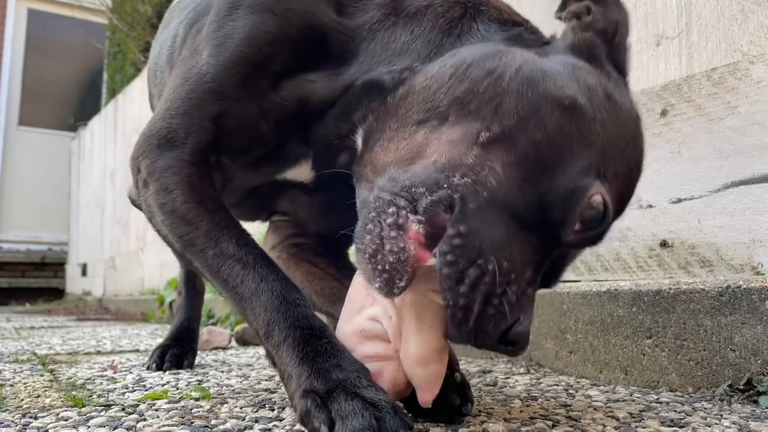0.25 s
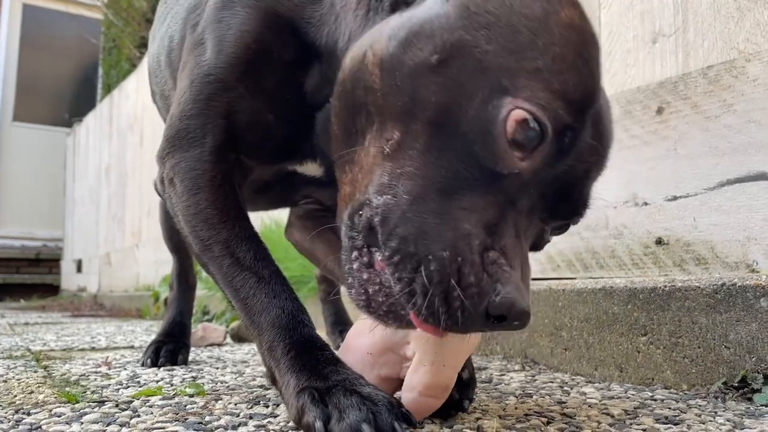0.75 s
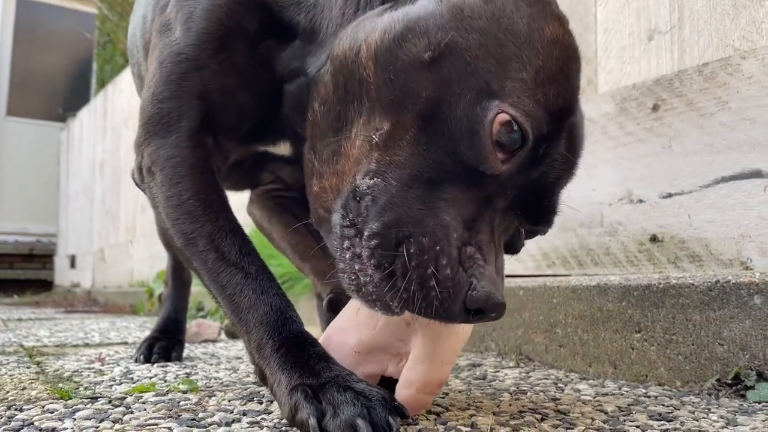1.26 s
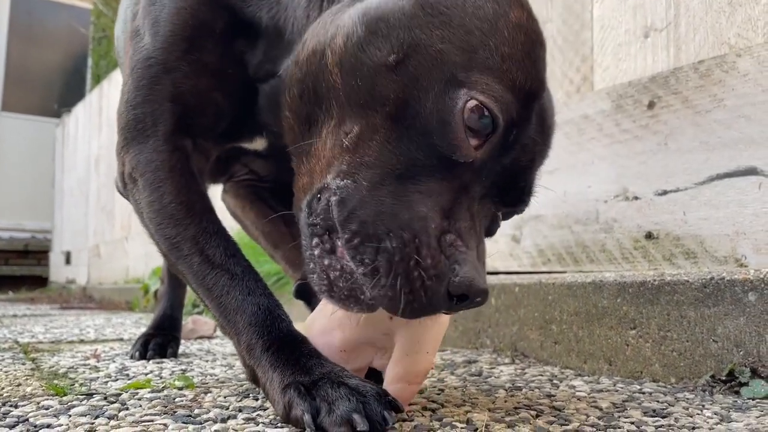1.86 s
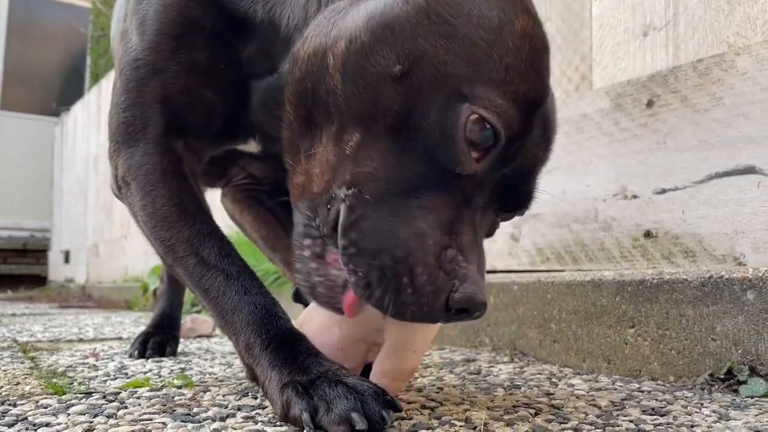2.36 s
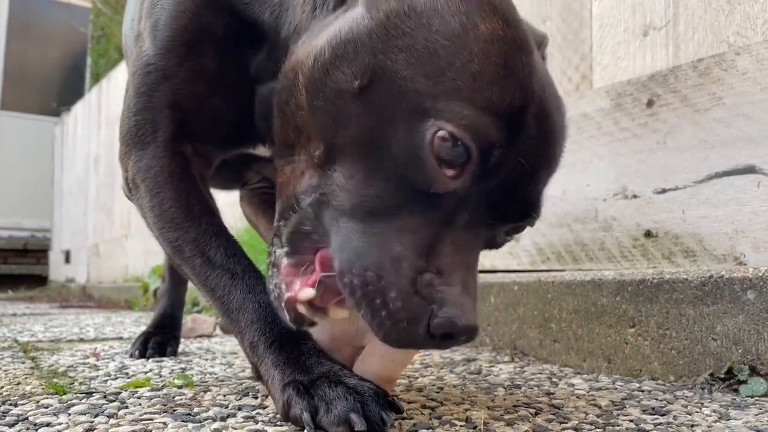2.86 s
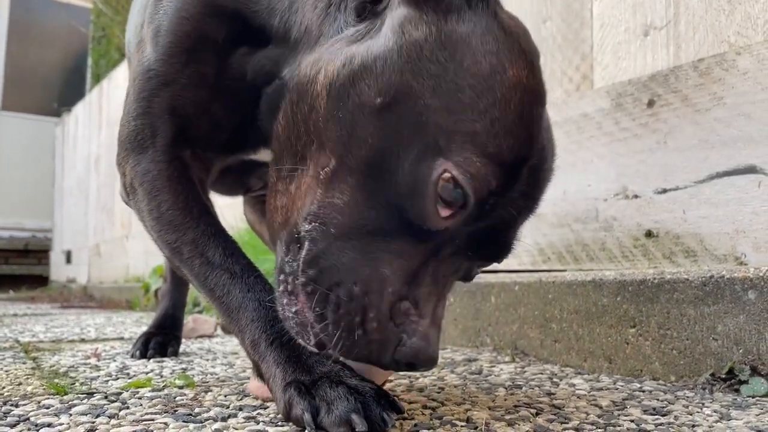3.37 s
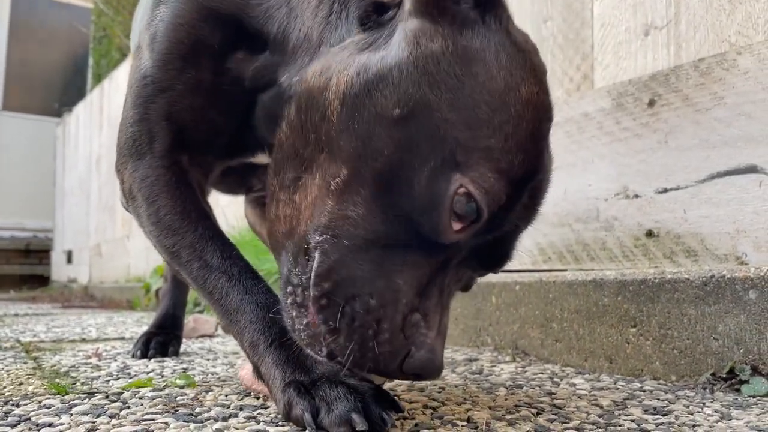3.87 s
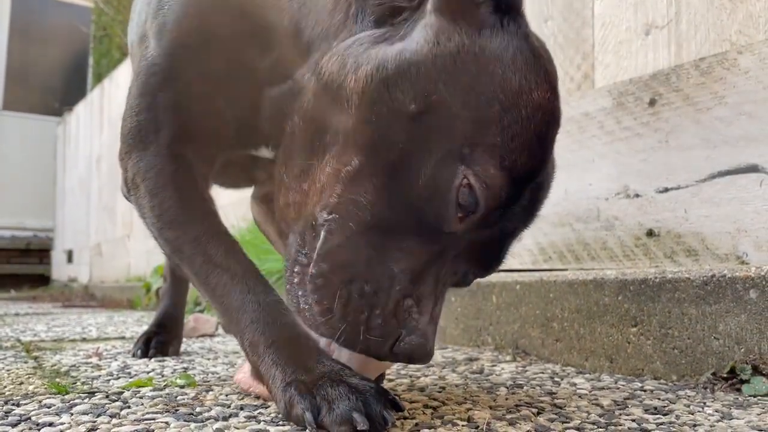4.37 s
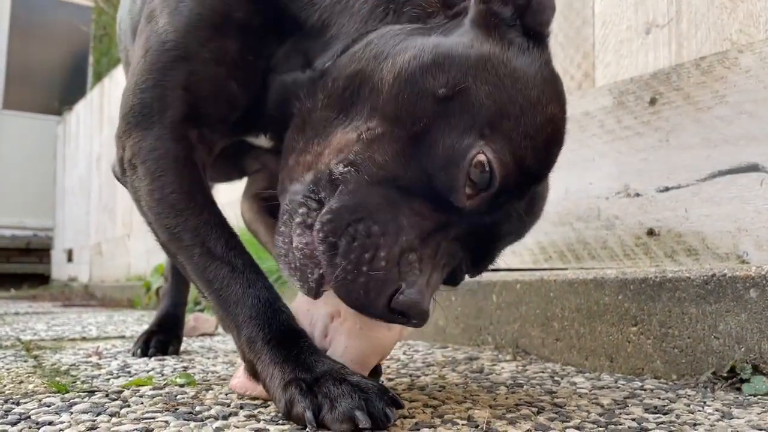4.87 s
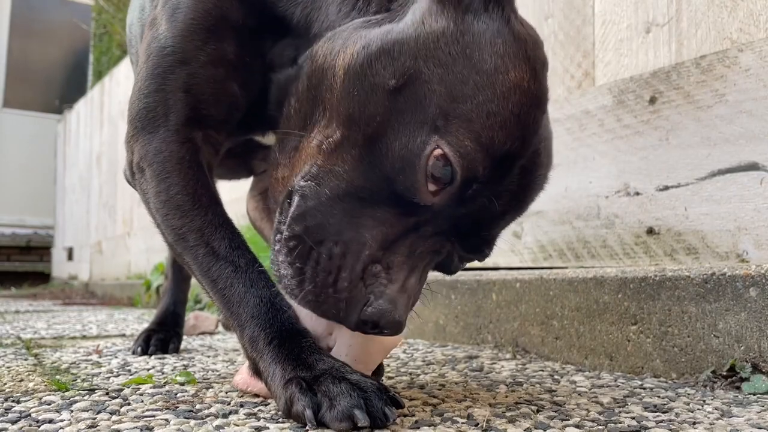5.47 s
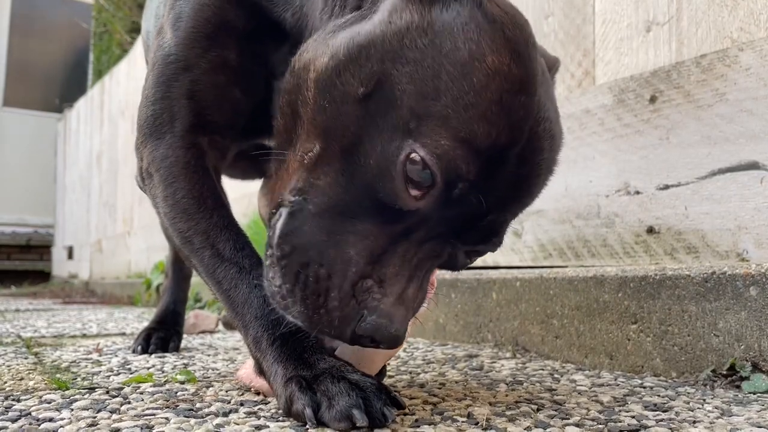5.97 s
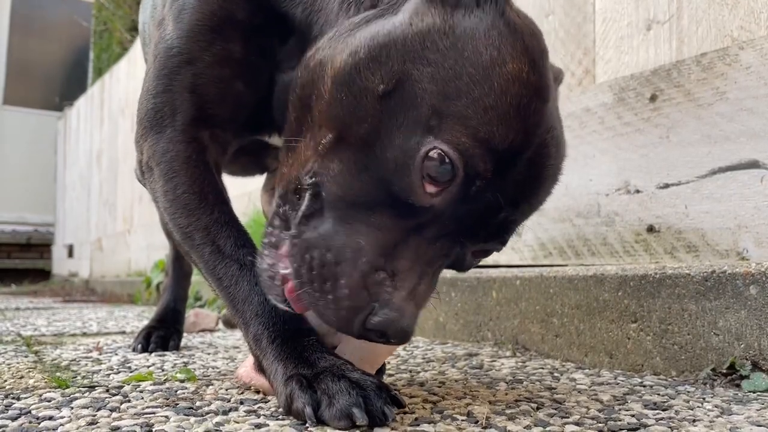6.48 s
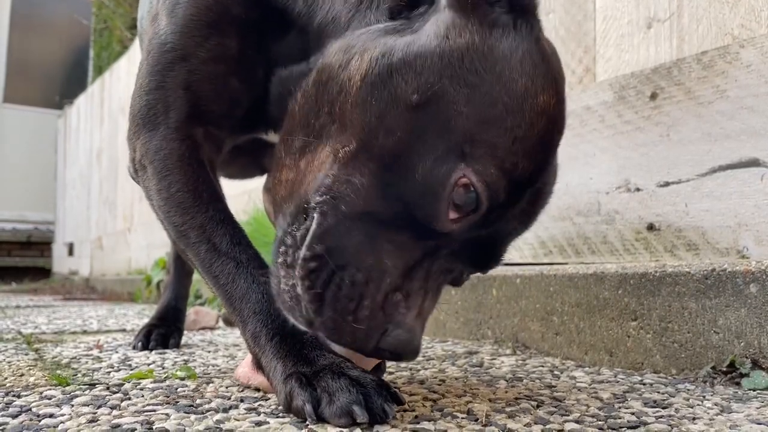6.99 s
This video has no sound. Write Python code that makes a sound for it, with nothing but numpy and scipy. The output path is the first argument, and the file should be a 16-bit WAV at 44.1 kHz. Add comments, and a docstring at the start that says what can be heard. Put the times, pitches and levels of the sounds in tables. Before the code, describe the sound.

A dog works at a bone right beside a small two-channel microphone outdoors. It opens with a burst of loud hollow pops, sticky clicks and a short bone scrape, then settles into uneven cracking bites and moist smacks. Crunching thickens midway, eases into lighter mouth clicks, then returns with low bumps, a breeze buffet and wet snaps. Light nasal hisses, low distant hum and only a short, dry reflection surround it.

```python
"""A pebbled yard: a puppy gnaws a raw meaty bone close to a phone with two microphone ports.
Teeth slip and crack on gristle: decaying tones ring the mouth hollow, with a crack and a noisy edge.
Wet flesh squelches and crunches as filtered crackle and grains; lips and spit click as short bubbles.
The bone drags as resonant crackle and bumps as low sagging tones; the nose huffs in gliding noise bands.
A breeze buffets the ports and the neighbourhood hums, both as stereo noise; thin high tones come and go."""
import sys
import numpy as np
from scipy import signal
from scipy.fft import rfft, irfft, next_fast_len
from scipy.io import wavfile
from scipy.ndimage import uniform_filter1d, map_coordinates

SR = 44100
rng = np.random.default_rng(int(sys.argv[2]) if len(sys.argv) > 2 else 0)


def persist_wave(psi):
    """Save psi, clipped to +-1, as 16-bit WAV."""
    counts = np.round(np.clip(psi, -1, 1) * 32767).astype(np.int16)
    wavfile.write(sys.argv[1], SR, np.atleast_2d(counts).T)


N = 318843

# Wet stir between bites. Each row: time in seconds, squelch in the mouth in dB, spit hiss in dB.
WET_STIR = [(0, -57, -57), (.2, -60, -59), (.32, -58, -50.5), (.52, -60.5, -78), (1.51, -68, -66),
            (2.85, -72.5, -64), (3.34, -54, -62), (3.81, -60, -63), (4.01, -80, -70.5), (4.57, -80, -57),
            (5.11, -74.5, -75.5), (5.82, -58.5, -54), (6.59, -81, -65), (7.23, -57.5, -62)]
# Crunches as the jaws close. Each row: middle in seconds, mouth, fizz and spit levels in dB,
# length in ms (at least 2 is used).
CRUNCHES = [(.07, -51, -76, -42, 12), (.225, -49, -68, -87, 22), (.3, -53, -54.5, -76, 44),
            (0.434, -40, -44, -93, 8.8), (.787, -77, -71, -54, 46), (.84, -70, -74, -66, 16),
            (0.897, -47.5, -63, -38, 13), (1.158, -43, -49, -52, 12.4), (1.34, -84, -64.5, -79, 56),
            (1.449, -49.5, -67, -51.5, 9.2), (1.654, -36, -45, -33, 9.2), (1.965, -43.5, -51.5, -44, 15.6),
            (2.129, -55.5, -59.5, -81, 15), (2.4, -39, -45, -43, 13), (2.571, -50, -61, -83, 24),
            (2.857, -36, -45, -42, 10.5), (2.984, -31, -40, -62, 9.3), (3.22, -40.5, -41, -37, 9.6),
            (3.453, -34.5, -40.5, -64, 7.6), (3.691, -46, -44.5, -51, 10), (3.78, -54.5, -59, -82, 23),
            (3.901, -51.5, -49.5, -54, 39.4), (4.214, -46.5, -50, -60, 13.6),
            (4.364, -49.5, -55.5, -66, 11.8), (4.582, -59, -55, -79, 9.9), (4.999, -46.5, -55, -57, 17.4),
            (5.299, -44.5, -46, -45.5, 12.2), (5.414, -49, -55.5, -71, 17), (5.694, -49, -43, -37.5, 8.3),
            (5.759, -56, -51, -64, 5.5), (5.877, -66, -45, -46, 6.2), (6.007, -77, -65, -40, 4.7),
            (6.073, -53, -47.5, -37, 3.4), (6.226, -45, -45.5, -35.5, 8.2), (6.505, -50.5, -49.5, -43, 18),
            (6.626, -44.5, -46, -47, 11.8), (6.877, -42, -42.5, -61, 8.1), (6.975, -66, -60, -54, 66)]
# The bone drags on the ground. Each row: middle in seconds, level in dB, half-length in ms.
BONE_RUBS = [(.28, -41.5, 62), (.83, -55, 19), (5.27, -58, 14), (6.1, -58, 60)]
# Mouth around the bone. Each row: mode in Hz, width in Hz, level in dB.
MOUTH_MODES = [(1086, 49, -5), (637, 410, -9), (1633, 100, -14.5)]
# The dragged bone. Each row: mode in Hz, width in Hz, level in dB.
BONE_MODES = [(230, 38, -2.5), (420, 160, -8), (607, 53, -2.5), (970, 33, -6)]
# Meat and cheeks. Each row: mode in Hz, width in Hz, level in dB.
FLESH_MODES = [(250, 96, -8), (455, 190, -14)]
# Spectrum of the wet fizz. Each row: frequency in Hz, density in dB per Hz.
WET_SPECTRUM = [(900, -40), (1500, -5), (2260, 6.5), (3210, -1), (5390, -3.5), (6800, -2.5), (8000, -88),
                (10400, -36), (17600, -120)]
# Spectrum of the spit. Each row: frequency in Hz, density in dB per Hz.
SPIT_SPECTRUM = [(4410, -9.5), (7500, -2.5), (11500, -15), (13500, -14), (14700, -6), (15900, -17),
                 (16400, 6)]
# Huffs through the nostrils. Each row: start in seconds, length in seconds, level in dB, centre in Hz.
HUFFS = [(0, 0.69, -58.5, 3233), (0.72, 0.18, -54, 3650), (1.079, .4, -60, 3440), (1.55, 0.26, -60, 3300),
         (2.601, 0.26, -65, 3260), (3.073, 0.21, -60.5, 3480), (3.307, 0.56, -57, 3510),
         (4.705, .18, -76, 3404), (4.921, .12, -54.5, 3205), (5.109, 0.18, -61, 3540),
         (5.45, 0.3, -58.5, 3540), (6.394, 0.083, -57, 3310), (6.699, 0.39, -53.5, 3440),
         (7.102, 0.2, -61, 3400)]
# Breeze on the ports. Each row: time in seconds, level in dB.
BREEZE_LEVEL = [(0.0, -41), (0.08, -54), (3.46, -54.5), (3.52, -40.5), (3.58, -49.5), (5.01, -54.5),
                (5.21, -50.5), (5.94, -53.5), (6.0, -43), (6.12, -44), (6.16, -31), (6.24, -50),
                (6.59, -51), (6.63, -42), (6.68, -69), (6.89, -48.5), (6.93, -66), (7.23, -57)]
# Spectrum of the buffeting. Each row: frequency in Hz, density in dB per Hz.
BUFFET_SPECTRUM = [(12, -81), (20, -80), (45, -0.5), (65, 4), (86, 2.5), (162, -7), (200, -19),
                   (260, -12.5), (440, -120)]
# Spectrum of the far hum. Each row: frequency in Hz, density in dB per Hz.
HUM_SPECTRUM = [(82, -27), (140, -4), (193, -1), (502, -5), (950, -2.5), (1200, -14.5), (1560, -11.5),
                (2640, -120)]
# Wet clicks of lips, tongue and spit. Each row: start in seconds, level in dB, pitch in Hz.
WET_CLICKS = [(.046, -38, 2120), (0.119, -28, 7500), (0.131, -34, 1460), (.14, -21.5, 10200),
              (.157, -32.5, 1500), (.201, -31, 3370), (.21, -34, 710), (0.435, -26, 3850),
              (6.529, -39, 999), (6.573, -41, 2240), (6.601, -40, 1060), (6.76, -40, 3060),
              (6.975, -34, 4560), (7.032, -31, 5400), (7.008, -30, 1030), (.353, -37, 1510),
              (0.423, -34, 1680), (0.654, -40.5, 2480), (.85, -31.5, 3630), (.458, -45, 3200),
              (.469, -38, 3200), (.79, -40, 4770), (.828, -38, 3500), (.886, -34, 3230), (5.434, -40, 2100),
              (5.5, -48, 2320), (5.576, -38.5, 3010), (5.6, -49, 2300), (5.72, -43, 3400),
              (6.412, -47.5, 2500), (3.472, -34, 2300), (3.001, -46, 1700), (1.608, -43, 2490),
              (1.821, -49, 4300), (1.897, -49, 3300), (2.036, -49, 4000), (2.137, -39, 3500),
              (3.81, -49, 2500), (3.886, -37, 5000), (4.085, -48, 2980), (4.105, -45, 3500),
              (4.37, -44, 6000), (4.389, -42, 8000), (4.517, -46, 3000), (4.573, -38, 11000),
              (4.595, -48, 9000), (4.817, -53, 7000), (4.907, -44, 8000), (4.958, -50, 10000),
              (5.058, -46, 2190), (5.132, -46, 7950), (5.199, -43, 5850), (5.253, -48, 5000),
              (.853, -33, 11000), (0.911, -26, 11100), (1.018, -50, 10100), (1.118, -50, 11000),
              (1.417, -38.5, 9300), (3.063, -56, 9050), (3.112, -46, 9000), (4.008, -48, 3000),
              (4.056, -48, 5070), (4.266, -39, 7000), (4.377, -42, 5000), (4.695, -53, 9000),
              (4.723, -53, 8800), (4.773, -41, 10100), (4.862, -51, 9000), (4.888, -46, 9200),
              (6.782, -42, 2610), (6.962, -34, 5500), (.883, -33, 9100), (.911, -28.5, 2160),
              (0.986, -36, 3340), (1.039, -45, 3800), (1.376, -35, 3320), (1.106, -38, 2270),
              (1.148, -23, 2620), (1.222, -35.5, 1090), (1.31, -29.5, 5300), (1.355, -29, 5800),
              (1.432, -42, 2110), (1.53, -40, 4240), (1.542, -38.5, 4430), (1.659, -17, 1660),
              (1.81, -52, 3370), (1.86, -35, 3330), (1.886, -51, 3020), (1.923, -39, 3600),
              (2.102, -43.5, 3200), (2.15, -47, 6000), (2.198, -46.5, 3800), (2.455, -39, 3500),
              (2.499, -46, 2180), (2.308, -38, 4230), (2.39, -22.5, 1620), (2.453, -28, 11800),
              (2.486, -42, 2200), (2.738, -34.5, 5800), (2.7, -42, 2900), (2.617, -35, 3380),
              (3.509, -45, 2280), (3.56, -35.5, 4300), (3.744, -39.5, 1400), (3.788, -37, 1790),
              (3.968, -38, 1020), (3.981, -34.5, 4360), (4.111, -43.5, 2420), (4.124, -41.5, 3700),
              (4.196, -37, 2580), (4.236, -38, 1410), (4.272, -37, 5440), (4.406, -45, 2270),
              (4.472, -31.5, 3430), (4.559, -33, 1700), (4.638, -37.5, 4800), (4.66, -47, 2600),
              (4.313, -43, 5130), (4.439, -41.5, 1080), (4.776, -40, 2560), (4.847, -40, 2330),
              (5.376, -38, 2240), (5.151, -30.5, 3230), (5.307, -28.5, 1040), (5.676, -33, 2950),
              (5.695, -37, 2950), (5.743, -48, 920), (5.752, -36, 3460), (5.759, -32, 5460),
              (5.833, -36, 1010), (5.874, -22.5, 6600), (5.92, -35, 3120), (6.002, -36.5, 3200),
              (6.041, -56, 1300), (6.07, -41, 2840), (6.081, -38, 1090), (6.099, -37, 1250),
              (6.146, -34.5, 2340), (6.198, -41, 5160), (6.301, -40, 2320), (6.355, -44, 2980),
              (6.486, -37, 3080), (6.5, -27.5, 864), (6.897, -37, 2140), (7.109, -39, 3130)]
# Snaps of teeth and gristle. Each row: start in seconds, mouth pitch in Hz, mouth level in dB,
# ring in ms (at least 0.4 is used), crack pitch in Hz, crack level in dB, edge level in dB.
TOOTH_SNAPS = [(.062, 950, -25, 1.6, 2260, -47.5, -30.5), (.243, 1030, -22, 2.2, 1950, -45, -51),
               (.265, 990, -23, 2.8, 1830, -38, -54), (0.278, 830, -1.5, 0.81, 2490, -18, -23),
               (.387, 760, -4.5, 1.24, 1860, -31, -50), (0.407, 567, -28, 3.1, 2270, -31.5, -29),
               (.443, 676, -7.5, 2.94, 3100, -22.5, -40), (.729, 960, -39, 3.3, 2714, -30.5, -33),
               (0.899, 790, -22, 2.35, 2050, -33, -18.5), (1.139, 960, -43, 1.4, 2840, -38, -35),
               (1.154, 786, -7, 0.94, 2080, -31.5, -29.5), (1.169, 950, -17, 1.1, 2090, -34.5, -53),
               (1.196, 533, -38, 4, 2400, -43.5, -35), (1.406, 1064, -31.5, 4, 1850, -43, -47),
               (1.445, 1440, -36, 3.5, 2050, -43.5, -52), (1.492, 940, -22.5, 1.43, 2050, -46.5, -35.5),
               (1.63, 1080, -8, 0.59, 1790, -35, -49), (1.652, 634, -28, 6.6, 1620, -25, -21.5),
               (1.691, 930, -39, 6.9, 2140, -33.5, -28), (1.728, 1090, -43, 2, 3280, -33.5, -51),
               (1.956, 1010, -28, 4, 2230, -37.5, -22), (1.976, 880, -14, 1.2, 2080, -56, -58),
               (2.13, 1640, -33.5, 1.5, 3110, -41.5, -56), (2.247, 1065, -46, 4.5, 2660, -36, -31),
               (2.372, 1600, -57, 2, 2850, -44, -30.5), (2.394, 1030, -4.5, 0.45, 2110, -27, -19),
               (2.531, 1200, -5.5, 0.72, 2520, -37.5, -33.5), (2.559, 1070, -27, 2.5, 1910, -36.5, -36),
               (2.631, 870, -4.5, 1.23, 2460, -26.5, -58), (2.837, 1550, -39, 6.4, 4060, -33.5, -23),
               (2.85, 965, -22, 3.6, 1820, -33, -29), (2.865, 940, -23, 1.9, 1920, -39, -40),
               (2.923, 970, -34, 2.8, 1920, -53, -45), (2.972, 907, -17, 2.9, 2130, -40, -49),
               (2.991, 950, -16, 2.9, 2120, -34, -33), (2.981, 936, -10, 4.2, 1836, -20.5, -10),
               (3.144, 1010, -35, 2.1, 2295, -53, -43), (3.216, 1670, -10.5, 0.7, 2530, -27, -20.5),
               (3.264, 1000, -30.5, 2.7, 2650, -55, -55), (3.305, 1050, -36, 3.3, 1830, -40.5, -48),
               (3.326, 985, -30.5, 5.9, 2040, -45, -51), (3.358, 936, -41, 7.5, 3130, -49, -40),
               (3.376, 970, -30.5, 3.1, 3500, -48.5, -48), (3.385, 967, -3.5, 3.74, 1710, -20, -16.5),
               (3.453, 980, -17, 1.7, 2290, -32.5, -15.5), (3.68, 1040, -55, 1.7, 2250, -34.5, -28),
               (3.693, 940, -8, 0.6, 3250, -36, -13.5), (3.825, 1025, -10.5, 4.5, 3100, -14, -17.5),
               (3.877, 930, -12.5, 2.17, 2540, -32.5, -23.5), (3.901, 763, -24, 2.2, 2430, -32.5, -28),
               (3.944, 633, -26.5, 1.9, 1644, -27.5, -21), (4.2, 1066, -37, 10, 2060, -36, -27),
               (4.222, 1580, -18.5, 1.67, 1950, -31, -27), (4.355, 970, -26.5, 3.1, 2430, -42.5, -35),
               (4.491, 870, -56, 2.8, 3110, -38.5, -27.5), (4.53, 1060, -32.5, 3.3, 1970, -45, -44),
               (4.582, 1033, -24, 3.7, 2190, -28.5, -60), (4.856, 1140, -18, 0.48, 3230, -47.5, -64),
               (4.987, 1072, -17.5, 2.5, 2850, -31.5, -25.5), (5.292, 1030, -34.5, 4.2, 2300, -44, -36),
               (5.359, 1690, -48, 6.5, 2220, -31, -56), (5.409, 1050, -20.5, 4.2, 1890, -27.5, -28.5),
               (5.808, 1120, -12, 1.3, 1890, -72, -31), (5.938, 1610, -50, 5, 2290, -32, -33),
               (6.062, 935, -20.5, 1.86, 2060, -44, -24.5), (6.221, 997, -28, 7.4, 2340, -30.5, -16.5),
               (6.504, 906, -15, 1.4, 2145, -31.5, -28), (6.553, 1050, -15.5, 0.94, 2170, -42, -55),
               (6.615, 1076, -14.5, 1.67, 2700, -34, -24.5), (6.868, 1053, -32.5, 8.7, 2215, -28.5, -16),
               (6.874, 1045, -31, 4.4, 2860, -29, -22), (6.983, 1080, -35, 1.7, 2220, -34, -16),
               (6.994, 890, -17.5, 1.2, 1880, -59, -41), (7.017, 1010, -18.5, 2.2, 1940, -34.5, -25.5),
               (7.07, 856, -31.5, 1.5, 2466, -39.5, -34)]
# Modes of a crack. Each row: ratio to its pitch, level in dB.
CRACK_MODES = [(.7, -6), (1, -1), (1.38, -9), (1.9, -18)]
# Jaw and bone bump the ground. Each row: start in seconds, level in dB, pitch it sags to in Hz.
GROUND_BUMPS = [(0.279, -25.5, 220), (0.32, -36, 144), (0.812, -31, 206), (5.18, -36.5, 80.3),
                (5.264, -36, 128), (5.312, -39.5, 83.6), (5.362, -38.5, 83), (4.2, -52, 164),
                (1.601, -54, 250), (6.45, -45, 300), (6.163, -37, 292), (2.528, -33, 210),
                (2.631, -30, 293), (2.984, -23, 310), (3.384, -21.5, 386), (3.499, -39, 90),
                (3.95, -34, 267), (5.661, -40, 101), (5.81, -30.5, 287), (5.835, -41, 300),
                (5.883, -39, 298), (0.444, -23, 248), (3.46, -29, 288), (5.992, -32, 71.4),
                (6.029, -30, 75.6), (6.06, -41, 90), (6.082, -38, 90), (6.114, -41, 119), (6.145, -25, 91),
                (6.187, -28, 97), (.262, -33, 215), (.29, -31, 215), (0.332, -37, 260), (2.301, -39.5, 199),
                (6.247, -39, 110)]
# Thin high tones, perhaps an insect. Each row: start in seconds, end in seconds, pitch in Hz, level in dB.
THIN_TONES = [(1.53, 1.78, 15400, -74), (1.69, 1.97, 15640, -69), (5.5, 5.7, 15400, -68),
              (5.66, 5.88, 15640, -69)]
# Phase between the ports. Each row: frequency in Hz, lead of the left port in radians.
PORT_LEAD = [(0, 0), (1000, .25), (2000, .6), (3800, 1.4), (5200, 1.4), (6200, 3.3), (8300, 2.9),
             (9900, .3), (12100, -.4), (13400, -2.9), (16100, -3.6)]
# Level between the ports. Each row: frequency in Hz, left over right in dB.
PORT_TILT = [(60, 0), (180, -1.5), (550, 3), (1650, 1.5), (4970, 3), (15000, 1.5)]

FIZZ_MEAN_DB, FIZZ_FOLLOW_SHARE = -71.5, 0.48  # the fizz follows this share of the squelch's swings
CRUNCH_RISE_SHARE = 0.81  # below 1: rises faster than it falls
FLESH_DB, FLESH_DB_PER_MS = -15, 0.3058  # re mouth level; long crunches move more meat
HUFF_RISE_SHARE, HUFF_REST_DB = 0.55, -88  # share of a huff spent swelling; faint air between huffs
HUFF_GLIDE = 0.068  # pitch slope per huff length, share of its centre
UPPER_RATIO, UPPER_DB = 1.564, -9.5  # second mode of the mouth hollow
TOP_HZ = 16500


def amp(db):
    """Gain of a dB value."""
    return 10 ** (np.asarray(db) / 20)


def unit(x):
    """x at rms 1."""
    return x / np.sqrt(np.mean(x ** 2) + 1e-20)


def along(points, hz):
    """(Hz, value) points interpolated on a log axis."""
    f, v = np.transpose(points)
    return np.interp(np.log(hz + 1), np.log(f + 1), v)


def curves(rows):
    """One value per sample for each column after the time."""
    s, *cols = np.transpose(rows)
    return [np.interp(np.arange(N) / SR, s, c) for c in cols]


def wobble(rate_hz):
    """A smooth random curve, rate_hz knots a second."""
    knots = rng.standard_normal(int(N * rate_hz / SR) + 4)
    return map_coordinates(knots, [np.arange(N) * rate_hz / SR])


def filtered(x, response):
    """x times a complex response of frequency."""
    m = next_fast_len(N + SR // 2)
    return irfft(rfft(x, m) * response(np.fft.rfftfreq(m, 1 / SR)), m)[..., :N]


def spectrum(points):
    """The gain curve of a spectrum table."""
    return lambda hz: amp(along(points, hz))


def resonance(f, hz, width_hz):
    """One causal resonance."""
    return 1j * f * width_hz / (hz * hz - f * f + 1j * f * width_hz)


def body(modes):
    """The causal response of a few resonances, alternating in sign."""
    return lambda f: sum((-1) ** k * amp(db) * resonance(f, hz, width_hz)
                         for k, (hz, width_hz, db) in enumerate(modes))


def puff(t, peak_s):
    """A quick swell and decay whose top is 1 at peak_s."""
    return t / peak_s * np.exp(1 - t / peak_s)


def pair(points, alike):
    """Stereo noise of rms 1, the ports partly alike."""
    a, b = filtered(rng.standard_normal((2, N)), spectrum(points))
    u = np.arccos(np.clip(alike, -1, 1)) / 2
    return unit(np.array([np.cos(u) * a + np.sin(u) * b, np.cos(u) * a - np.sin(u) * b]))


def crackle(count, spread_db, noise_share):
    """Tiny films of spit bursting, count a second with a few big ones, over plain noise."""
    hit = rng.random(N) < count / SR
    size = np.minimum(rng.exponential(1, N), np.pi)
    sign = np.sign(rng.standard_normal(N))
    pops = unit(hit * sign * amp(spread_db * size))
    share = np.clip(noise_share, 0, 1)
    return np.sqrt(1 - share) * pops + np.sqrt(share) * rng.standard_normal(N)


def grains(count, hz, octaves, cycles, spread_db):
    """Little cracks and bursting bubbles, count a second, each with its own pitch and a short life; rms 1."""
    when, pitch, size = rng.random((3, int(count * N / SR)))
    n = np.arange(SR // 100)
    turns = hz * 2 ** (octaves * (2 * pitch - 1))[:, None] * n / SR
    level = amp(-spread_db * np.log(size + 1 / 20))[:, None]
    shape = turns * np.exp(-turns / cycles) * np.sin(2 * np.pi * turns) * level
    at = (when * N).astype(int)[:, None] + n
    return unit(np.bincount(at.ravel(), shape.ravel(), N + SR)[:N])


def bites():
    """Power over time of each crunch layer: a lopsided bell for every bite."""
    power, t = np.zeros((4, N)), np.arange(N) / SR
    for s, mouth_db, fizz_db, spit_db, length_ms in CRUNCHES:
        near = slice(max(round((s - .15) * SR), 0), round((s + .15) * SR))
        side = np.where(t[near] < s, CRUNCH_RISE_SHARE, 2 - CRUNCH_RISE_SHARE)
        width_s = max(length_ms, 2) / 1000 * side
        flesh_db = mouth_db + FLESH_DB + FLESH_DB_PER_MS * length_ms
        levels = amp([mouth_db, fizz_db, spit_db, flesh_db])
        power[:, near] += levels[:, None] ** 2 * np.exp(-((t[near] - s) / width_s) ** 2)
    return power


def bone_drag():
    """The bone drags on the ground: crackle through its resonances in flat-topped swells."""
    t = np.arange(N) / SR
    rub = sum(amp(db) * np.exp(-((t - s) * 1000 / ms) ** 4) for s, db, ms in BONE_RUBS)
    return rub * amp(2 * wobble(60)) * unit(filtered(crackle(600, 3, .5), body(BONE_MODES)))


def squelch():
    """Flesh and spit work between the jaws: a wet stir with stray ticks, and clustered cracks in every bite."""
    mouth_db, hiss_db = curves(WET_STIR)
    fizz_db = FIZZ_MEAN_DB + FIZZ_FOLLOW_SHARE * (mouth_db - mouth_db.mean())
    shared_db = 5.1 * wobble(15)
    own_db = 2.4 * np.array([wobble(20), wobble(24), wobble(24)])
    stir = amp([mouth_db, fizz_db, hiss_db] + shared_db + own_db)
    bite = np.sqrt(bites())

    low = unit(filtered(crackle(600, 5, .13), body(MOUTH_MODES)))
    mid = unit(filtered(crackle(1200, 2, .32), spectrum(WET_SPECTRUM)))
    high = unit(filtered(crackle(1200, 17, .12), spectrum(SPIT_SPECTRUM)))
    mist = unit(filtered(crackle(1500, 8, .55), spectrum(SPIT_SPECTRUM)))
    flesh = unit(filtered(rng.standard_normal(N), body(FLESH_MODES)))
    ticks = .9 * grains(count=80, hz=2600, octaves=1.1, cycles=1.3, spread_db=3)
    pops = grains(count=350, hz=1000, octaves=.12, cycles=1.4, spread_db=3) + .5 * low
    cracks = grains(count=260, hz=2410, octaves=.96, cycles=.46, spread_db=.5) + .55 * mid

    between = (stir * [low, mid + ticks, mist]).sum(0)
    crunch = (bite * [pops, cracks, high, flesh]).sum(0)
    return between + crunch


def nose():
    """Breath hisses through the nostrils: bands of noise around, above and below a pitch that rises in each huff."""
    t, level = np.arange(N) / SR, amp(HUFF_REST_DB)
    glide = []
    for s, length_s, db, centre_hz in HUFFS:
        u = (t - s) / length_s
        swell = np.minimum(u / HUFF_RISE_SHARE, (1 - u) / (1 - HUFF_RISE_SHARE))
        level = level + amp(db) * np.clip(swell, 0, 1)
        glide += [(s + length_s * v, centre_hz * (1 + HUFF_GLIDE * (v - .5))) for v in (.1, .9)]
    hz, = curves(glide)
    # slow noise, moved up to the pitch
    a, b = filtered(rng.standard_normal((2, N)), lambda f: 1 / np.sqrt(1 + (f / 110) ** 2))
    turn = 2 * np.pi * np.cumsum(hz + 90 * wobble(12)) / SR
    flutter = amp(2.1 * wobble(30))
    main = a * np.cos(turn) + b * np.sin(turn)
    outer = b * np.cos(1.17 * turn) + a * np.sin(.63 * turn)
    return level * flutter * unit(main + amp(-8.5 + 11 * wobble(14)) * outer)


def yard():
    """A breeze buffets the ports in lumps; distant traffic and air hum underneath, all as shaped noise."""
    buffet_db, = curves(BREEZE_LEVEL)
    buffet = amp(buffet_db + 3.1 * wobble(16)) * pair(BUFFET_SPECTRUM, alike=.85)
    hum = amp(-57.5 + .317 * wobble(1.3) + 1.64 * wobble(9)) * pair(HUM_SPECTRUM, alike=.25)
    air = amp(-70.5) * pair(WET_SPECTRUM, alike=.0503)
    return buffet + hum + air


def clicks():
    """Each wet click is a bubble of a cycle or two at its own pitch with a spray of noise."""
    out, t = np.zeros(N + SR), np.arange(SR // 100) / SR
    for s, db, hz in WET_CLICKS:
        spray = .07 * np.diff(rng.standard_normal(len(t) + 1)) * puff(t, .0011)
        colour = 1 + .51 * np.cos(.9 * np.pi * hz * t)
        bubble = puff(t, .8 / hz) * np.sin(2 * np.pi * hz * t) * colour
        out[round(s * SR):][:len(t)] += amp(db) * (bubble + spray)
    return out[:N]


def snaps():
    """Each snap rings the mouth hollow for a few cycles; a bony crack and a noisy edge start it."""
    t = np.arange(SR // 25) / SR
    tones, edge = np.zeros((2, N + len(t)))
    for s, hz, mouth_db, ring_ms, crack_hz, crack_db, edge_db in TOOTH_SNAPS:
        at = slice(round(s * SR), round(s * SR) + len(t))
        grit = rng.standard_normal((2, len(t)))
        ring_s = max(ring_ms, .4) / 1000
        swell = (1 - np.exp(-t / .0014)) * np.exp(-(t / ring_s) ** 2 / 2)
        pitch_hz = hz * (1 + .013 * (2 * np.exp(-t / .0035) - 1))  # sags as the jaws part
        turn = 2 * np.pi * np.cumsum(pitch_hz) / SR
        upper = amp(UPPER_DB - 60 * t / .06) * np.sin(UPPER_RATIO * turn)
        ring = amp(mouth_db) * swell * (np.sin(turn) + upper)
        tones[at] += ring

        # the tooth slips once just before it breaks through
        slip = max(at.start - round(rng.uniform(.00508, .00885) * SR), 0)
        tones[slip:slip + len(t)] += amp(-21) * ring

        # splintering roughens the bone's ring
        smooth = uniform_filter1d(uniform_filter1d(grit[0], size=8), size=8)
        rough = 1 + .8 * smooth * np.sqrt(12)
        crack = sum(amp(db) * np.sin(2 * np.pi * ratio * crack_hz * t) for ratio, db in CRACK_MODES)
        tones[at] += amp(crack_db) * rough * puff(t, .0013) ** 2 * crack
        edge[at] += amp(edge_db) * grit[1] * puff(t, .0015) ** 2
    teeth = filtered(edge[:N], lambda f: resonance(f, 6200, 1860) ** 2)
    return tones[:N] + teeth


def thumps():
    """Jaw and bone push the ground: soft low tones of about two cycles, the pitch sagging."""
    out, t = np.zeros(N + SR), np.arange(SR // 10) / SR
    for s, db, hz in GROUND_BUMPS:
        u = t * hz / .46
        cycles = hz * t + .2 * (1 - np.exp(-2 * u))
        out[round(s * SR):][:len(t)] += amp(db) * u * np.exp(1 - u) * np.sin(2 * np.pi * cycles)
    return out[:N]


def whine():
    """Each thin tone is a sine that swells, flutters and fades."""
    t = np.arange(N) / SR
    flutter = amp(4.7 * wobble(40))
    tones = 0
    for start_s, end_s, hz, db in THIN_TONES:
        fade = np.clip(np.minimum(t - start_s, end_s - t) / .016, 0, 1)
        tones = tones + amp(db) * fade * np.sin(2 * np.pi * hz * t)
    return flutter * tones


def walls(x):
    """The paving and the garden wall return a short diffuse scatter."""
    t = np.arange(SR // 8) / SR
    tail = rng.standard_normal((2, len(t))) * amp(-60 * t / .024)
    tail = uniform_filter1d(tail, size=2, axis=1)  # pebbles and plaster swallow the treble
    late = np.pad(x, (60, 0))[None]  # 60 samples
    return signal.fftconvolve(late, tail / np.linalg.norm(tail[0]), axes=1)[:, :N]


def ports(x):
    """The two ports hear the near mouth with their own phase and level; the difference sways as the head turns."""
    side = np.array([[1], [-1]])
    left, right = filtered(x, lambda hz: amp(side * along(PORT_TILT, hz) / 2)
                           * np.exp(.5j * side * along(PORT_LEAD, hz)))
    sway = amp(-1 + 2.5 * wobble(4))
    return (left + right) / 2 + side * sway * (left - right) / 2


def scene():
    """The pup close by, the yard around."""
    pup = snaps() + clicks() + squelch() + bone_drag() + thumps() + nose()
    echo = amp(-16) * walls(pup)
    return ports(pup) + echo + yard() + whine()


def record(dry):
    """The phone rolls off the top treble and keeps nothing above its band limit."""
    return filtered(dry, lambda hz: amp(-7 / (1 + (13300 / (hz + 1)) ** 30)) * (hz < TOP_HZ))


dry = scene()
out = record(dry)
persist_wave(out)
```